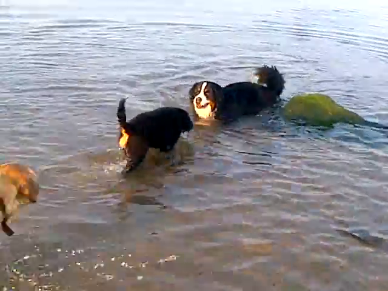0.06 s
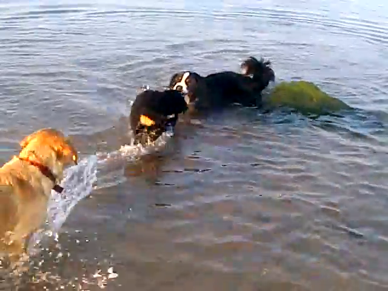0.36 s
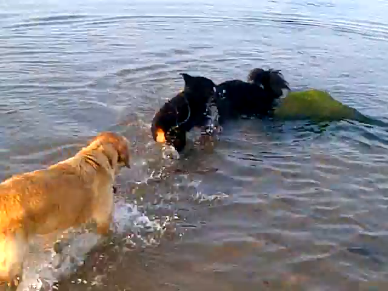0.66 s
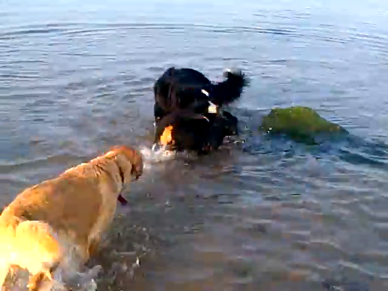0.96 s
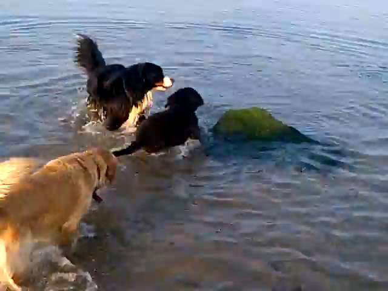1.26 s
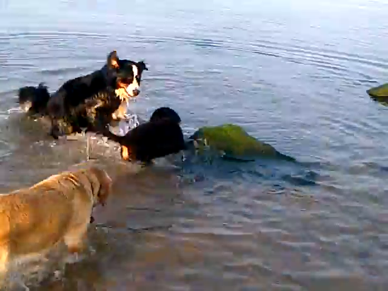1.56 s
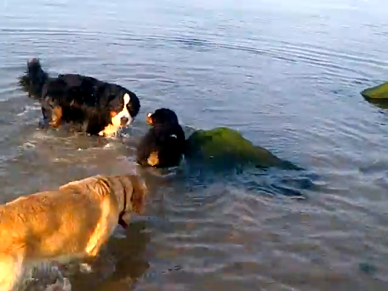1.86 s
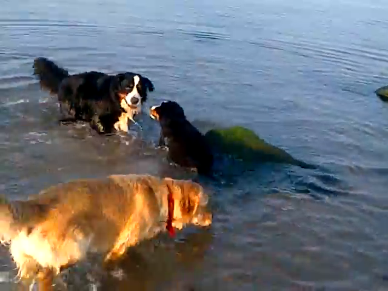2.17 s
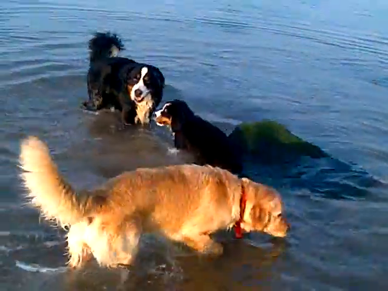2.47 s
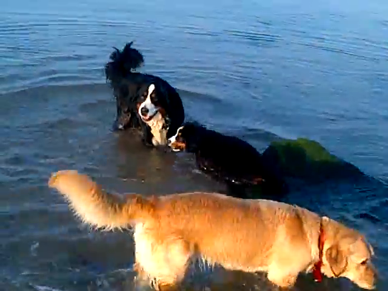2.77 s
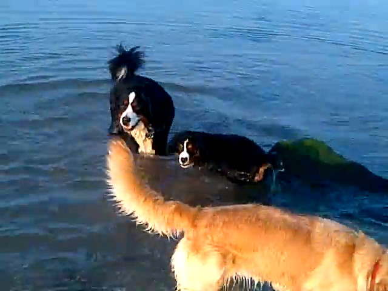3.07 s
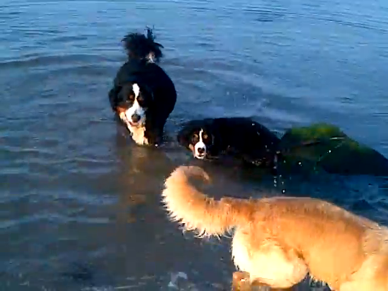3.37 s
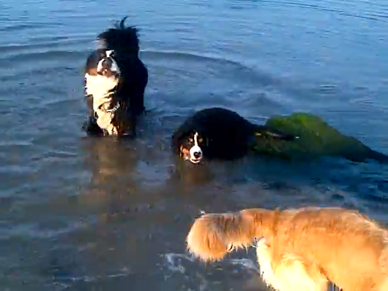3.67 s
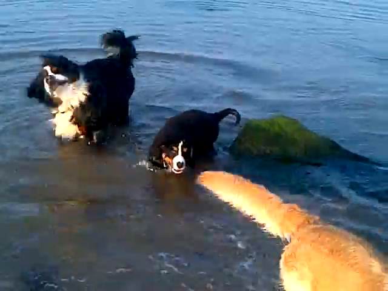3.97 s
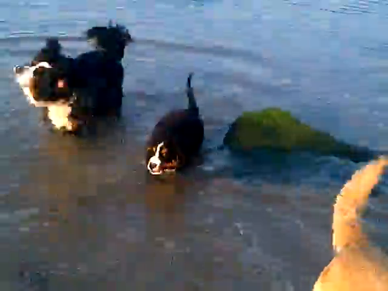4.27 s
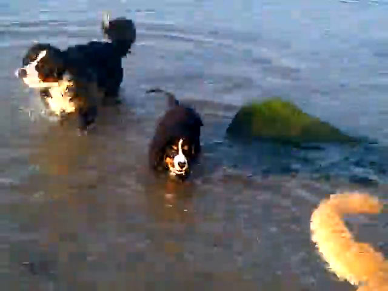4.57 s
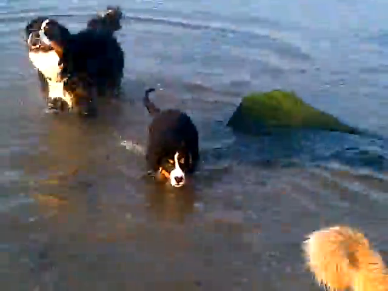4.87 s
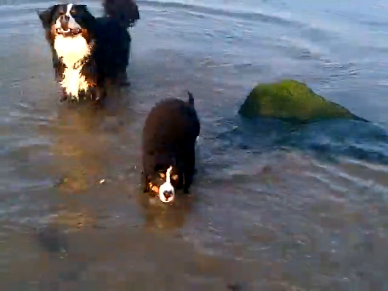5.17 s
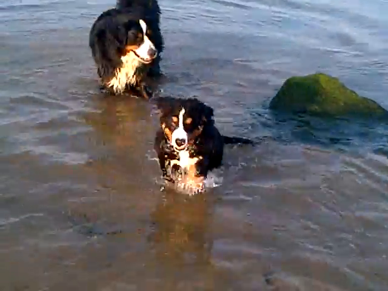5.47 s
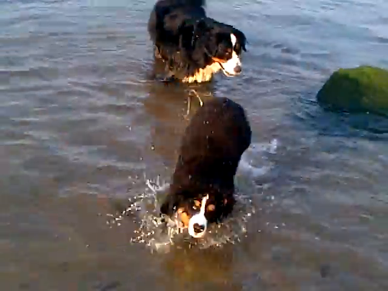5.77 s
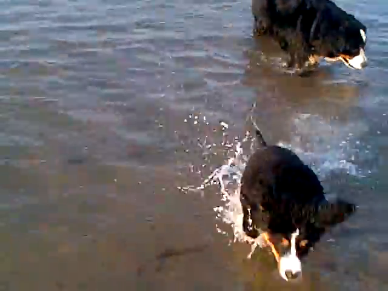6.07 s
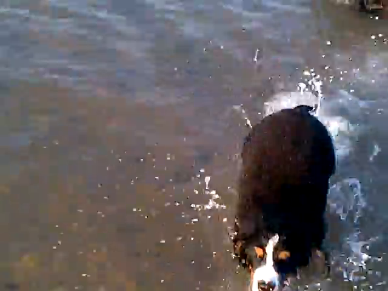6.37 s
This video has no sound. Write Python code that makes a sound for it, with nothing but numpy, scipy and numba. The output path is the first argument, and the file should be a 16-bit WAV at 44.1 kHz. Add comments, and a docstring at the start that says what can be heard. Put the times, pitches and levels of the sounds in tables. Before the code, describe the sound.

Dogs splash through shallow sea water close to the microphone, without a break, for about six and a half seconds. From the start to around 1.8 seconds the splashing is lively: legs churn up bubbles, paws slap the surface, and spray patters back, with a sharp slap near 0.4 seconds and a strong hollow plop near 1.2. From about 2 to 4 seconds it eases into gentle wading, with light splashes, drips and a few small gurgles around 2.7. From roughly 4.3 seconds the sloshing and plops pick up again. Sharper slaps come at about 5.7 to 6 seconds, and the water is churned hardest from 6.2 to the end. Faint lapping of the calm sea and a very faint, wavering low hum lie underneath throughout. The sound is open-air and nearly dry, with little bass and softened highs.

```python
"""A calm sea shore, where three dogs bound and wade through the shallows close by.
Their legs entrain clouds of bubbles, each a damped oscillator, and throw spray that patters back;
drops fall from wet fur. Paws slap the surface and punch air pockets that resonate in plops and gulps.
Behind them lie faint lapping water and a low hum."""
import sys
import numpy as np
from scipy import signal
from scipy.io import wavfile
from numba import njit

SR = 44100
rng = np.random.default_rng(int(sys.argv[2]) if len(sys.argv) > 2 else 0)


def unload_audio(sound):
    """Save the sound as a 16-bit wav file, at the path given as the first command line argument."""
    columns = np.transpose(np.atleast_2d(sound))
    # keep every value between -1 and 1, then stretch to whole-number steps
    steps = np.round(np.clip(columns, -1, 1) * 32767)
    wavfile.write(sys.argv[1], SR, steps.astype(np.int16))


N = 284004

# steady stirring by the legs: t/s, churn level/dB, spray level/dB
WADING_LEVELS = [(0.0, -41, -36), (0.25, -41, -36), (0.59, -35, -32), (1.34, -34, -36), (1.81, -39, -37),
                 (2.02, -41, -42), (2.46, -43, -41), (2.83, -45, -46), (3.02, -42, -43), (3.42, -44, -49),
                 (3.57, -44, -45), (3.91, -41, -42), (4.32, -42, -43), (4.61, -39, -36), (5.36, -39, -41),
                 (5.92, -36, -34.5), (6.26, -30, -33), (6.44, -30, -29)]
# spectral envelope of splashing water: f/Hz, level/dB
SPRAY_SPECTRUM = [(150, -45), (300, -13.5), (700, 1), (1300, -1.5), (2200, -3), (3200, -6.5), (4800, -6),
                  (5800, -11.5), (6800, -18.5), (7500, -37.5)]
# air pockets punched by paws: t/s, level/dB, f/Hz
AIR_POCKETS = [(0.002, -34.5, 232), (0.385, -18, 687), (0.479, -23.5, 535), (0.5036, -25.5, 596),
               (0.665, -23.5, 910), (0.776, -20.5, 404), (1.119, -16.5, 492), (1.203, -25, 982),
               (1.2345, -12.5, 508), (1.27, -25, 706), (1.417, -24.5, 480), (1.587, -30.5, 514),
               (1.614, -26.5, 510), (2.405, -30.5, 420), (2.922, -29, 950), (2.956, -24, 660),
               (3.093, -26.5, 720), (3.3624, -27.5, 634), (3.407, -37, 614), (3.7978, -30.5, 427),
               (4.034, -28.5, 610), (4.147, -29, 530), (4.1914, -26, 560), (4.352, -26, 336),
               (4.553, -31.5, 335), (4.603, -21.5, 415), (4.69, -23.5, 545), (4.892, -23, 317),
               (4.999, -26, 970), (5.13, -31.5, 218), (5.4456, -23, 307), (5.4999, -23, 303),
               (5.579, -22.5, 606), (5.7044, -18.5, 407), (5.728, -23, 283), (5.909, -17, 585),
               (5.9945, -19.5, 593), (6, -24, 293), (6.181, -20.5, 660), (6.3, -18.5, 680),
               (6.334, -18, 520)]


def amp(db):
    """Amplitude ratio of a level in decibels."""
    return 10 ** (np.asarray(db) / 20)


def unit(x):
    """Normalisation to rms 1."""
    return x / np.sqrt(np.mean(x ** 2) + 1e-20)


def curve(rows, column):
    """Linear interpolation of a table column over time."""
    rows = np.asarray(rows)
    return np.interp(np.arange(N) / SR, rows[:, 0], rows[:, column])


def add(mix, start_s, sound):
    """Superposition of a sound on the mix."""
    part = mix[max(round(start_s * SR), 0):][:len(sound)]
    part += sound[:len(part)]


def colour(x, spectrum, size=4096):
    """Minimum-phase filtering: the spectrum is shaped causally, so attacks stay sharp."""
    hz, db = np.transpose(spectrum)
    bin_hz = abs(np.fft.fftfreq(size, 1 / SR)) + 1
    log_gain = np.log(amp(np.interp(np.log(bin_hz), np.log(hz), db)))
    taps = np.fft.ifft(np.exp(np.conj(signal.hilbert(log_gain)))).real
    return signal.oaconvolve(x, taps[:size // 2])[:len(x)]


def resonate(x, hz, width_hz):
    """Forced response of a damped resonator whose natural frequency may glide."""
    turn = np.exp(2j * np.pi * np.cumsum(hz * np.ones(len(x))) / SR)
    pole = np.exp(-np.pi * width_hz / SR)
    return 2 * (turn * signal.lfilter([1 - pole], [1, -pole], x / turn)).real


def lapping():
    """Amplitude modulation: broadband noise swells and sinks at random as water laps the shore."""
    # spectral envelope of the calm sea: f/Hz, level/dB
    sea_spectrum = [(25, 0), (40, -10.5), (80, -9), (130, -10.5), (200, -6), (320, -5.5), (490, -2.5),
                    (1500, -11), (3000, -10.5), (4800, -11), (7400, -28)]
    knots = np.arange(N) / SR * 5  # five random levels a second
    drift_db = unit(np.interp(knots, np.arange(knots[-1] // 1 + 2), rng.normal(size=int(knots[-1]) + 2)))
    return amp(-47.5) * unit(colour(rng.standard_normal(N), sea_spectrum) * amp(drift_db))


def hum():
    """Narrow-band noise has a fluctuating envelope, heard as a wavering low hum."""
    # two bands an octave apart: f/Hz, resonator width/Hz, level/dB
    bands = [(69.5, 16, -69), (139, 5.6, -60.5)]
    return sum(amp(db) * unit(resonate(resonate(rng.standard_normal(N), hz, width), hz, 2 * width))
               for hz, width, db in bands)


def stirring(steady_db, by_depth_db, fall_db_per_s, swell_db_per_s=220):
    """Incoherent sources add in power: the level in dB of leg strokes on top of steady wading."""
    # leg strokes: t/s of the peak, level/dB, depth (0 skimming to 1 plunging)
    strokes = [(0.01, -33.5, .65), (0.39, -37, .4), (0.55, -36, .4), (0.785, -33, .85), (1.04, -38.5, .45),
               (1.13, -37, 1), (1.24, -35, .6), (1.61, -38, .8), (1.71, -40, .95), (1.84, -40, .55),
               (2.41, -41, .75), (2.56, -40, .45), (3.19, -46, .1), (3.34, -43, .65), (3.53, -43, .7),
               (3.74, -41, .55), (4.08, -41, .85), (4.205, -40, .65), (4.36, -39, .7), (4.41, -37.5, .55),
               (4.59, -37, .4), (4.70, -38.5, .65), (4.90, -40.5, .9), (4.979, -38, .3), (5.495, -33.5, .4),
               (5.58, -37, .6), (5.72, -37.5, 1), (5.78, -39, .2), (5.91, -37, .35), (6.005, -37.5, .85),
               (6.18, -35, .9), (6.31, -32.5, .1), (6.41, -30.5, .8)]
    t, power = np.arange(N) / SR, amp(steady_db) ** 2
    for peak_s, db, depth in strokes:
        below_db = np.maximum((peak_s - t) * swell_db_per_s, (t - peak_s) * fall_db_per_s)
        near = below_db < 40
        power[near] += amp(db + np.interp(depth, (0, 1), by_depth_db) - below_db[near]) ** 2
    return 10 * np.log10(power)


@njit
def ring(births, hz, strength, cycles, rise):
    """Damped oscillation: each bubble decays by 60 dB, its pitch rising as it nears the surface."""
    out = np.zeros(N)
    for k in range(len(births)):
        life, angle = cycles[k] / hz[k] * SR, 2 * np.pi * hz[k] / SR
        swing = strength[k] + 0j
        step = np.exp(1j * angle - np.log(1000) / life)
        climb = np.exp(1j * angle * rise[k] / life)
        for i in range(min(int(life), N - births[k])):
            out[births[k] + i] += swing.imag * min(i * angle / np.pi, 1.)  # half-cycle onset
            swing *= step
            step *= climb
    return out


def cloud(level_db, low_hz, high_hz, per_s, cycles, rise, spread_db, clump_s, clump_width, count):
    """Air entrainment: bubbles form in clumps of like size, more often under harder stirring."""
    births_so_far = np.cumsum(amp(level_db))
    when, pitch, chance = np.repeat(rng.random((int(per_s * N / SR), 3)), count, axis=0).T
    lag, detune, push, damping, climb = rng.standard_normal((len(when), 5)).T
    clump_starts = np.searchsorted(births_so_far, when * births_so_far[-1])
    births = (clump_starts + lag * clump_s * SR).astype(np.int64) % N
    hz = low_hz * (high_hz / low_hz) ** pitch * np.exp(clump_width * detune)
    clump_gain = amp(-spread_db * np.log(chance + 0.043))
    strength = np.tanh(push) * hz * clump_gain  # small bubbles die sooner but ring harder
    bubbles = ring(births, hz, strength, cycles * np.exp(.4 * damping), rise * abs(climb))
    return bubbles / amp(level_db / 2)  # mean power independent of the birth rate


def churn():
    """Bubble resonance falls with size: legs fold in middle-sized bubbles and heave up large, dull ones."""
    # spectral envelope of the bubble cloud: f/Hz, level/dB
    cloud_spectrum = [(150, -40.5), (280, -10.5), (380, -1.5), (490, 3.5), (700, -0.5), (1100, -6),
                      (1800, -24), (3500, -17)]
    steady_db = curve(WADING_LEVELS, column=1)
    stir_db = stirring(steady_db, by_depth_db=(0, 0), fall_db_per_s=130)
    heave_db = stirring(steady_db - 16, by_depth_db=(-14.5, 0), fall_db_per_s=163.5)
    bubbles = cloud(stir_db, 300.6, 2436, per_s=220, cycles=19.5, rise=0.46,
                    spread_db=1.1, clump_s=.006, clump_width=0.1464, count=5)
    pockets = cloud(heave_db, 182, 369, per_s=140, cycles=10.6, rise=0.31,
                    spread_db=1.5, clump_s=0.00999, clump_width=0.15, count=3)
    return amp(stir_db - 1) * unit(colour(bubbles, cloud_spectrum)) + amp(heave_db + 1) * unit(pockets)


def spray():
    """Drop impact: water thrown by skimming legs falls back as a patter with pings of tiny bubbles."""
    spray_db = stirring(curve(WADING_LEVELS, column=2), by_depth_db=(5.5, -5), fall_db_per_s=100)
    impacts = cloud(spray_db, 990, 7830, per_s=1300, cycles=5.1, rise=0.091,
                    spread_db=-1.2, clump_s=.0009, clump_width=0.38, count=4)
    pings = cloud(spray_db, 899, 3703, per_s=380, cycles=52, rise=0.73,
                  spread_db=3.8, clump_s=.004, clump_width=0.1277, count=3)
    patter = unit(colour(unit(impacts) + amp(-3) * unit(pings), SPRAY_SPECTRUM))
    coarse = signal.sosfiltfilt(signal.butter(2, 3200, fs=SR, output="sos"), patter)
    fine_gain = amp(0.28 * (spray_db + 43.5))  # gentle steps throw few fine drops
    return amp(spray_db) * (coarse + fine_gain * (patter - coarse))


def drips():
    """Lightly damped bubble resonance: drops from wet fur leave rising plinks."""
    stir_db = curve(WADING_LEVELS, column=1)
    plinks = cloud(stir_db / 4, 700, 2400, per_s=30, cycles=55, rise=0.5,
                   spread_db=0.5, clump_s=.008, clump_width=.12, count=2)
    return amp(-49) * unit(plinks)


def plops(swell_cycles=1.92, overtone_ratio=1.69):
    """Cavity resonance: an air pocket swings a few times and collapses as water slops into it."""
    out, t = np.zeros(N), np.arange(SR // 8) / SR
    for start_s, db, hz in AIR_POCKETS:
        age = t * hz / swell_cycles  # large pockets swell more slowly
        swell = age * np.exp(1 - age)
        angle = 2 * np.pi * hz * (t + 3 * t ** 2)
        modes = np.sin(angle) + amp(-10) * np.sin(overtone_ratio * angle)  # the pocket is not round
        slop = unit(resonate(resonate(rng.standard_normal(len(t)), hz, 0.43 * hz), hz, 7.4 * hz))
        add(out, start_s, amp(db - 0.2) * modes * swell ** 2.8 + amp(db - 6.5) * slop * swell ** 0.91)
    return out


def slaps(grain_db=7.5):
    """Impulsive excitation: the struck surface cracks, then tears in a short, grainy burst."""
    # blows of a paw or a sheet of water: t/s, level/dB, centre f/Hz, decay T60/s
    blows = [(0.0195, -21.5, 1730, 0.022), (0.03, -23, 2230, 0.023), (0.102, -24.5, 3220, 0.086),
             (0.1608, -24.5, 2526, 0.032), (0.3415, -22, 1690, 0.054), (0.3972, -14.5, 1900, 0.035),
             (0.506, -20, 2090, 0.05), (0.7915, -22, 1920, 0.036), (0.8425, -24, 1900, 0.016),
             (0.9615, -23.5, 1600, 0.032), (1.1215, -25, 1100, 0.014), (1.238, -21.5, 2400, 0.077),
             (1.2715, -24.5, 2200, 0.028), (1.591, -20.5, 1810, 0.02), (1.6661, -26.5, 2080, 0.069),
             (1.93, -27.5, 3240, 0.11), (2.013, -27, 2370, 0.02), (2.291, -30, 3200, 0.0091),
             (2.405, -29.5, 3400, 0.037), (2.861, -32, 1960, 0.012), (2.9232, -31.5, 1540, 0.02),
             (2.9394, -32.5, 3200, 0.02), (3.092, -31.5, 1300, 0.071), (3.1812, -31, 3120, 0.026),
             (3.197, -30.5, 2400, 0.07), (3.254, -34.5, 3400, 0.024), (3.3658, -34, 1400, 0.014),
             (3.5701, -32, 3260, 0.05), (3.6147, -36, 3800, 0.042), (3.687, -33.5, 2200, 0.12),
             (3.829, -28, 2000, 0.08), (3.897, -28, 3900, 0.015), (4.243, -27.5, 1840, 0.018),
             (4.4351, -22.5, 2300, 0.034), (4.515, -27, 2700, 0.067), (4.591, -23, 3500, 0.02),
             (4.652, -21.5, 3280, 0.011), (4.948, -24, 2680, 0.03), (5.012, -24, 2130, 0.015),
             (5.2011, -26, 2000, 0.052), (5.269, -30, 1500, 0.013), (5.35, -27, 1500, 0.039),
             (5.481, -27.5, 3000, 0.14), (5.7085, -20, 950, 0.017), (5.764, -15, 3270, 0.02),
             (5.841, -23.5, 2900, 0.054), (5.903, -13, 1900, 0.02), (5.914, -16.5, 1460, 0.031),
             (5.9216, -17.5, 2500, 0.011), (5.966, -29, 2700, 0.012), (5.983, -19, 1500, 0.02),
             (6.0385, -20, 3250, 0.041), (6.277, -18, 3200, 0.022), (6.303, -20.5, 1590, 0.021),
             (6.3115, -20, 3700, 0.04), (6.338, -22, 1900, 0.04), (6.3684, -16, 2000, 0.035),
             (6.3855, -17.5, 2600, 0.065)]
    out, t = np.zeros(N), np.arange(SR // 8) / SR
    for start_s, db, hz, t60 in blows:
        noise = rng.standard_normal(len(t))
        grains = noise * amp(grain_db * np.repeat(rng.uniform(-1, 1, len(t)), 30)[:len(t)])
        burst = (1 - np.exp(-t / (0.033 * t60))) * amp(-60 * t / t60)
        tear = grains * burst * np.linalg.norm(burst) / np.linalg.norm(grains * burst)
        tear[np.searchsorted(t, .001)] += amp(13.5 - 190 * t60)  # a short, flat blow clicks sharply
        tilt_db_per_octave = 4.9 * np.log2(hz / 2300)  # small splashes are brighter
        spectrum = [(f, level + tilt_db_per_octave * np.log2(f / 2300)) for f, level in SPRAY_SPECTRUM]
        body = resonate(resonate(tear, 1.04 * hz, 0.62 * hz), 0.5 * hz, 0.93 * hz)
        add(out, start_s, amp(db) * (amp(7.5) * colour(tear, spectrum) + amp(5.5) * body))
    return out


def slosh(lag_scale_s=0.03, fall_db_per_s=91.5):
    """Fragmentation: water closes over each pocket and breaks it into eight rising bubbles."""
    start_s, db, pocket_hz = np.repeat(AIR_POCKETS, 8, axis=0).T
    lag_x, lag_y, detune, polarity = rng.standard_normal((len(db), 4)).T
    lag_s = lag_scale_s * np.hypot(lag_x, lag_y)  # Rayleigh distribution
    births = ((start_s + lag_s) * SR).astype(np.int64)
    hz = pocket_hz * np.exp(.12 + 0.3 * detune)
    strength = np.sign(polarity) * amp(db - 11 - fall_db_per_s * lag_s)
    return ring(births, hz, strength, cycles=np.full(len(hz), 15.), rise=np.full(len(hz), 0.23))


def gulps():
    """A resonator of changing volume: the note of a hollow slides as water gurgles into it."""
    # hollows behind the legs: t/s, duration/s, first f/Hz, last f/Hz, level/dB
    hollows = [(0.749, 0.058, 523, 370, -34.5), (1.358, 0.08, 391, 560, -38.5),
               (1.644, 0.032, 202, 300, -44), (1.701, 0.05, 289, 400, -35), (2.428, 0.069, 428, 556, -41.5),
               (2.615, 0.027, 1860, 1350, -40), (2.622, 0.045, 735, 1034, -38),
               (2.671, 0.011, 1680, 2200, -38), (2.691, 0.021, 1426, 2350, -43),
               (2.7, 0.058, 437, 522, -45), (2.722, 0.026, 2050, 2520, -45.5),
               (2.792, 0.031, 1320, 3200, -45.5), (3.318, 0.042, 1333, 880, -43),
               (3.992, 0.049, 106, 168, -44), (4.287, 0.061, 664, 475, -41),
               (4.345, 0.047, 268, 170, -38.5), (4.594, 0.037, 130, 266, -40),
               (5.106, 0.031, 125, 330, -37), (5.124, 0.05, 286, 495, -32), (5.395, 0.048, 491, 189, -41),
               (5.549, 0.026, 385, 630, -36.5), (5.79, 0.045, 907, 1580, -36.5),
               (6.41, 0.037, 294, 369, -26.5)]
    out = np.zeros(N)
    for start_s, length_s, first_hz, last_hz, db in hollows:
        hz = np.geomspace(first_hz, last_hz, int(length_s * SR))
        flow, width_hz = rng.standard_normal(len(hz)), 0.089 * first_hz
        gurgle = unit(resonate(resonate(flow, hz, width_hz), hz, 2 * width_hz))
        note = np.sin(2 * np.pi * np.cumsum(hz) / SR)
        swell = abs(np.sin(np.pi * np.linspace(0, 1, len(hz)) ** 0.53)) ** 1.3  # fast rise, slower fade
        add(out, start_s, amp(db) * unit((gurgle + amp(5) * note) * swell))
    return out


def shore(x, t60_s=0.21):
    """Diffuse scattering: rocks and ripples return a short, exponentially decaying tail."""
    t = np.arange(SR // 4) / SR
    tail = rng.standard_normal(len(t)) * amp(-60 * t / t60_s) * (t > .004)
    return signal.oaconvolve(x, tail / np.linalg.norm(tail))[:N]


def scene():
    """Superposition of the near splashing, its scattered sound, the calm sea and the hum."""
    background = lapping() + hum()
    splashing = churn() + spray() + drips() + plops() + slaps() + slosh() + gulps()
    shallows = signal.butter(4, 140, "high", fs=SR, output="sos")  # shallow water holds no larger pockets
    splashing = signal.sosfilt(shallows, splashing)
    return (splashing + amp(-14) * shore(splashing) + background)[None]


def record(dry):
    """Band limiting: a small microphone has weak bass and a steep upper edge."""
    thin = signal.sosfilt(signal.butter(2, 60, "high", fs=SR, output="sos"), dry)
    soft = signal.sosfilt(signal.butter(4, 6600, fs=SR, output="sos"), thin)
    edge = signal.firwin(511, 7450, window=("kaiser", 9), fs=SR)
    return signal.oaconvolve(soft, edge[None], "same")


dry = scene()
out = record(dry)
unload_audio(out)
```